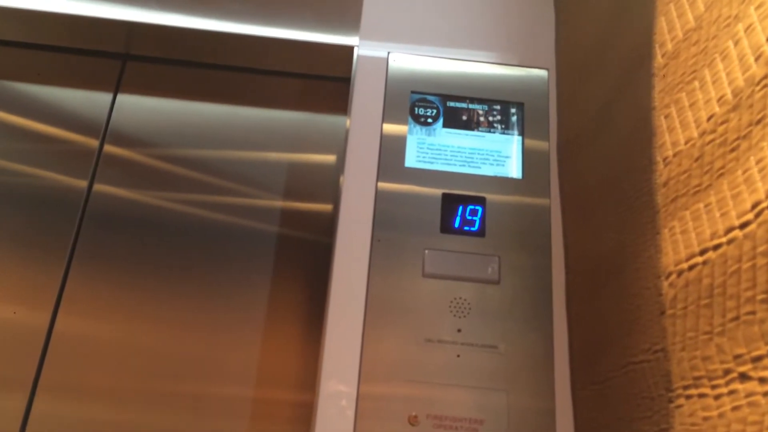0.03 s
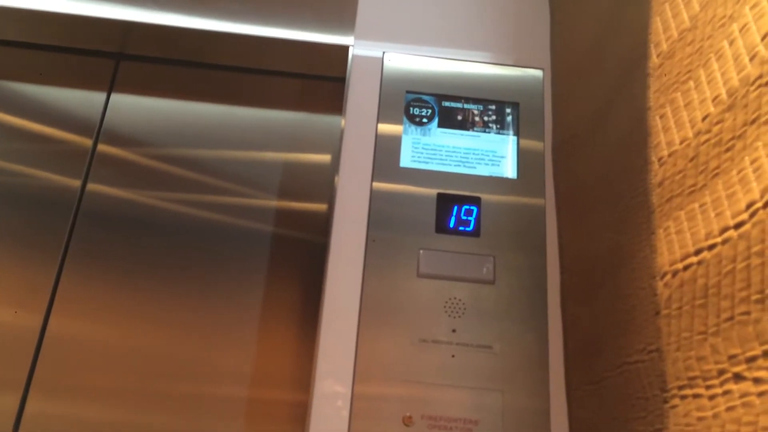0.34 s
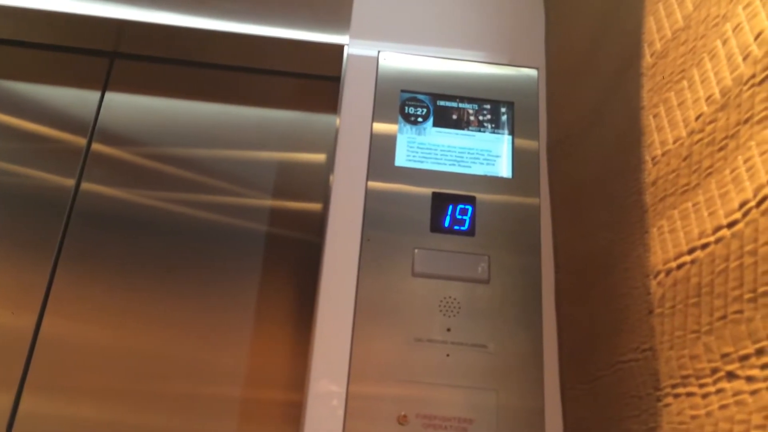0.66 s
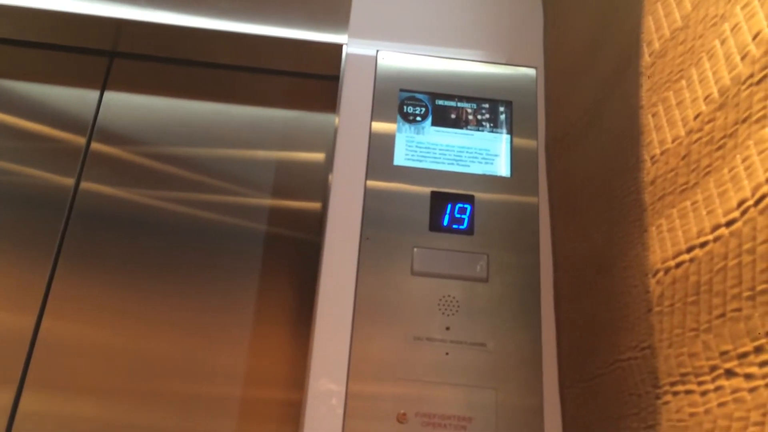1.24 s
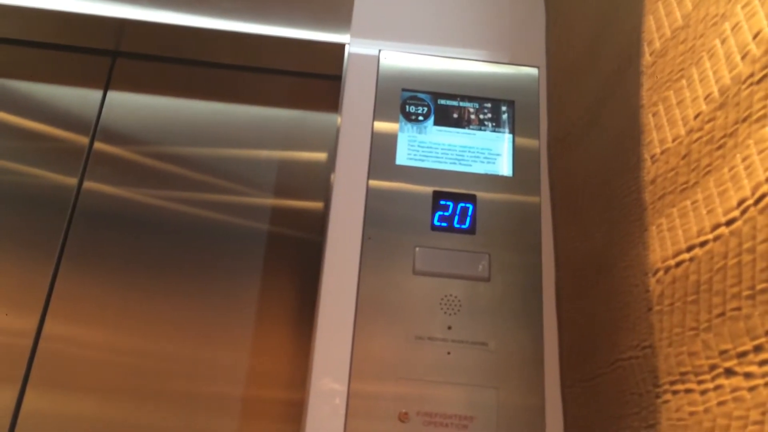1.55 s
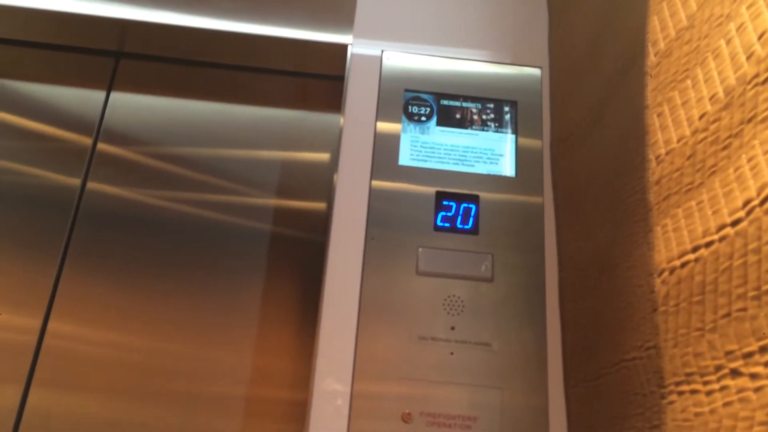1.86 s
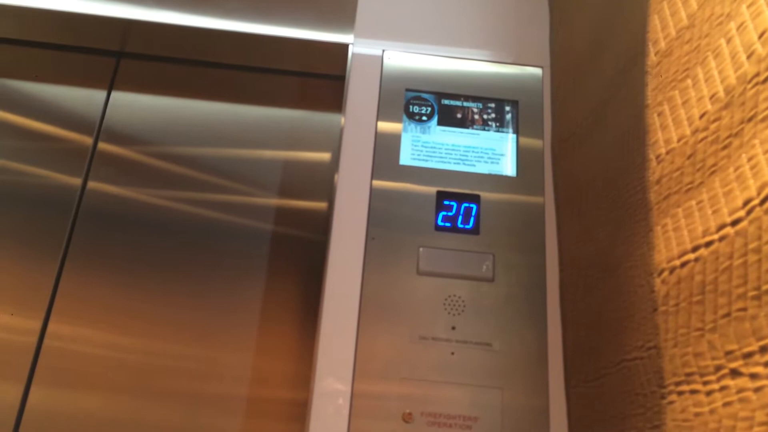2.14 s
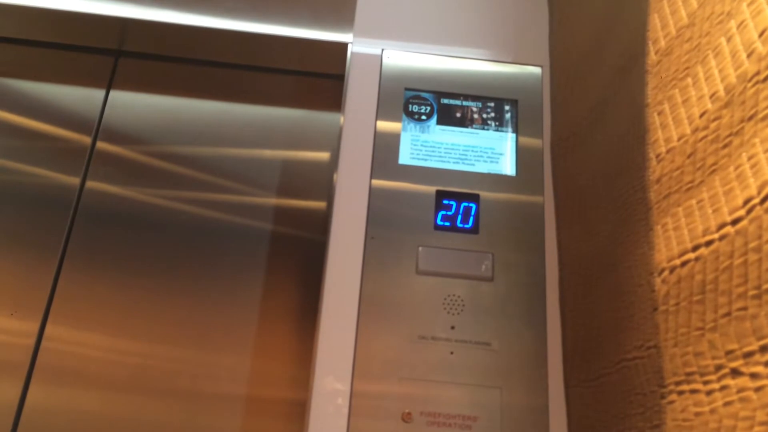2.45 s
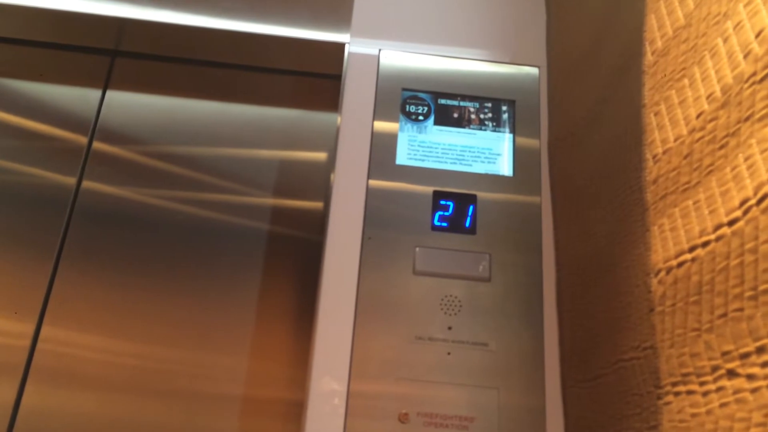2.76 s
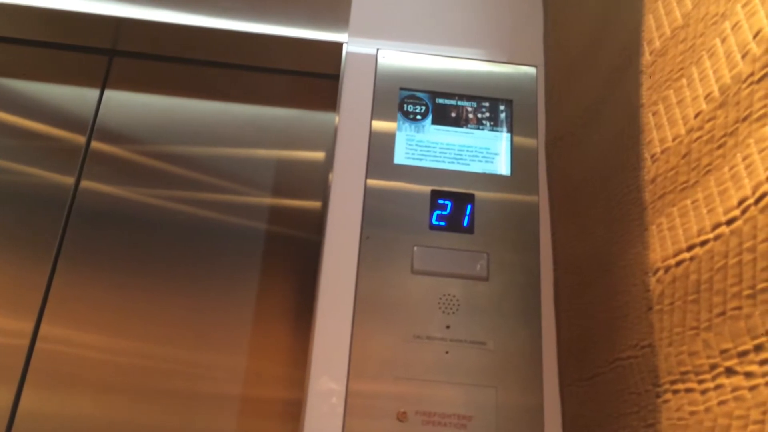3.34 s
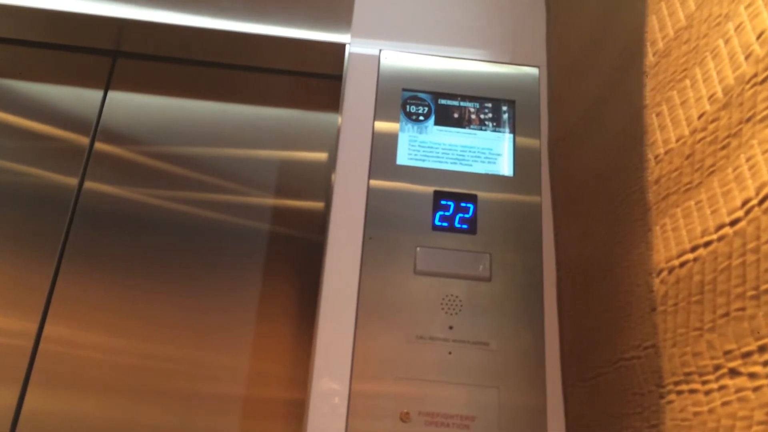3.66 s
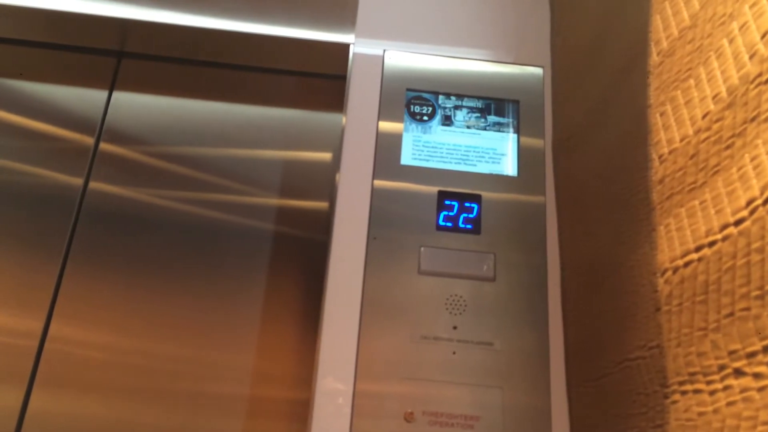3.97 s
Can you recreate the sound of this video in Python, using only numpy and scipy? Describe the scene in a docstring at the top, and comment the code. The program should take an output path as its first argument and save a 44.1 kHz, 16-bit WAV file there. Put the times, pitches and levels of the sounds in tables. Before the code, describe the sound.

An elevator car rumbles throughout with a wavering low hum and soft rushing air, booming slightly near 0.3 and 1.9 seconds. Light heel taps, scuffs, tiny ticks and faint clothing rustle are scattered until about 3.5 seconds. A hard catch snaps loudly with a brief ring at about 1.1 seconds, and a latch clicks more softly at 2.8. The clicks echo briefly off the close walls.

```python
"""A rising elevator car rumbles and booms as the rails shake the air in the cabin.
Under it the hoist gives a wavering hum, and air rushes in the shaft.
A passenger shifts about: clothes rustle, heels tap the hard floor, soles scuff and faintly squeak.
A hard catch snaps loudly with a brief ring; later a latch clicks shut more softly.
Grit or fittings tick now and then, and the clicks echo briefly off the close walls."""
import sys
import numpy as np
from scipy import signal
from scipy.fft import rfft, irfft
from scipy.io import wavfile
from scipy.ndimage import uniform_filter1d

SR = 44100
rng = np.random.default_rng(int(sys.argv[2]) if len(sys.argv) > 2 else 0)


def wrap_up_sound(samples):
    """Save the sound to the file named by the first command line argument, as 16-bit audio."""
    columns = np.atleast_2d(samples).T
    # keep every value between -1 and 1, then stretch to whole-number steps
    tamed = np.clip(columns, -1, 1)
    steps = np.round(tamed * 32767).astype(np.int16)
    wavfile.write(sys.argv[1], SR, steps)


N = 176400
T = np.arange(N) / SR


def amp(db):
    """Turns decibels into a volume multiplier."""
    return 10 ** (np.asarray(db) / 20)


def evened(x):
    """Scales a signal to an average strength (rms) of 1."""
    return x / np.sqrt(np.mean(x ** 2) + 1e-20)


def add(mix, start, sound):
    """Mixes a sound in at a start time in seconds."""
    part = mix[max(round(start * SR), 0):][:len(sound)]
    part += sound[:len(part)]


def level(points):
    """Draws a volume curve through points of seconds and dB."""
    return amp(np.interp(T, *np.transpose(points)))


def colour(x, points, size=4096):
    """Shapes the tone. The points only set the balance between low and high, not the volume."""
    hz, db = np.transpose(points)
    log_hz = np.log(abs(np.fft.fftfreq(size, 1 / SR)) + 1)
    log_gain = np.log(amp(np.interp(log_hz, np.log(hz), db)))
    response = np.exp(np.conj(signal.hilbert(log_gain)))  # nothing sounds ahead of a hit
    taps = np.fft.ifft(response).real
    return signal.fftconvolve(x, taps / np.linalg.norm(taps))[:len(x)]


def drift(rate_hz):
    """A smooth random wander; a higher rate makes it quicker."""
    smoothing = 1 + (np.fft.rfftfreq(N, 1 / SR) / rate_hz) ** 2
    return evened(irfft(rfft(rng.standard_normal(N)) / smoothing, N))


def ring(modes, rise_s):
    """A struck object rings with a few tones. Each drops 60 dB over its fade time."""
    t = T[:SR // 2]
    tones = sum(amp(db - 60 * t / fade_s) * np.sin(2 * np.pi * (hz * t + rng.random()))
                for hz, db, fade_s in modes)
    return (1 - np.exp(-t / rise_s)) * tones


def impact(direct, early, fade_s, near_walls_s=0.0027, echo_s=0.0095):
    """A click in the cabin: the direct sound, a burst off near walls, an echo and a dulling tail."""
    t = T[:SR // 3]
    noise = rng.standard_normal(len(t))
    dull = signal.sosfiltfilt(signal.butter(4, 10800, fs=SR, output="sos"), noise)
    treble = (noise - dull) * amp(-234 * t)  # loses an extra 234 dB a second
    burst = 1 + early * np.exp(-(t / near_walls_s) ** 2)
    out = (dull + treble) * amp(-60 * t / fade_s) * burst
    out /= np.linalg.norm(out)
    out[0] -= direct
    out[round(echo_s * SR)] -= direct
    return out / np.linalg.norm(out)


# The tone of the rushing air. Each row: frequency in Hz, relative level in dB.
AIR_TONE = [(100, 2), (300, 7), (450, 0.5), (650, -3), (900, -3), (1350, -6), (2000, -15), (3000, -25),
            (5000, -30), (9000, -33), (15000, -36)]
# How loud the air is. Each row: time in seconds, level in dB.
AIR_LEVEL = [(0, -51), (.25, -49), (.5, -51), (.95, -52.5), (1.2, -49.5), (1.6, -52), (2.7, -51.5),
             (2.95, -54), (3.4, -53), (4, -58.5)]

def shaft_air(flutter_db=1.42):
    """Air rushes through the shaft, a little unevenly."""
    air = rng.standard_normal(N) * amp(flutter_db * drift(rate_hz=20))
    return colour(air, AIR_TONE) * level(AIR_LEVEL)


# The tone of rubbing cloth. Each row: frequency in Hz, relative level in dB.
CLOTH_TONE = [(500, -10), (1800, 12), (3500, 2.5), (6000, 1), (9000, -4.5), (14000, -8.5), (16000, -19)]
# How loud the cloth is. Each row: time in seconds, level in dB.
CLOTH_LEVEL = [(0, -72.5), (.24, -70.5), (.45, -89), (.9, -74), (1.17, -63), (1.31, -66), (1.4, -72.5),
               (1.48, -64), (1.99, -66), (2.07, -55.5), (2.11, -59), (2.155, -59), (2.19, -63.5),
               (2.54, -66), (2.65, -60.5), (2.78, -59.5), (2.88, -70), (3.13, -62), (3.25, -66.5),
               (4, -66.5)]

def clothes(grain_db=1.5, clump_db=1):
    """Fabric rubs in fine grains that come in clumps."""
    grain = amp(grain_db * drift(rate_hz=210) + clump_db * drift(rate_hz=13))
    return colour(evened(rng.standard_normal(N) * grain), CLOTH_TONE) * level(CLOTH_LEVEL)


# The squeak's fuzzy tones. Each row: pitch in Hz, width in Hz, level in dB.
SQUEAK_TONES = [(1590, 150, -60), (4730, 420, -74)]

def sole_squeak(middle_s=0.25, half_length_s=0.075):
    """Rubber drags on the floor and squeaks faintly."""
    tones = np.zeros(N)
    for hz, width, db in SQUEAK_TONES:
        phase = 2 * np.pi * hz * T
        tones += amp(db) * evened(drift(width / 2) * np.cos(phase) + drift(width / 2) * np.sin(phase))
    return tones * np.exp(-((T - middle_s) / half_length_s) ** 4)


# Small bright ticks. Each row: start in seconds, pitch in Hz, level in dB.
GRIT_TICKS = [(.205, 9400, -42.5), (0.542, 5860, -33.5), (1.564, 2900, -31.5), (1.605, 2830, -27.5),
              (2.431, 5800, -36), (2.584, 2680, -31), (2.584, 6040, -34), (3.368, 3000, -30.5),
              (3.372, 6900, -41)]

def ticks(width_hz=520):
    """Grit or fittings give tiny pings that echo in the cabin."""
    out, t = np.zeros(N), T[:SR // 100]
    for start, hz, db in GRIT_TICKS:
        ping = np.exp(-np.pi * width_hz * t) * np.sin(2 * np.pi * hz * t)
        cabin = impact(direct=0.32, early=0.19, fade_s=0.12)
        add(out, start, amp(db) * signal.fftconvolve(cabin, ping / np.linalg.norm(ping)))
    return out


# The tones of a dull bump. Each row: pitch in Hz, relative level in dB, fade time in seconds.
BUMP_TONES = [(463, 0, 0.15), (410, 0.5, 0.043), (635, 3, 0.026)]
# Soft scuffs. Each row: middle in seconds, about half the length in seconds, level in dB.
SOLE_SCUFFS = [(0.188, 0.023, -44), (0.325, 0.027, -44), (1.195, 0.01, -40.5), (1.216, 0.022, -49),
               (1.313, 0.012, -45), (2.117, 0.0093, -49), (2.214, 0.032, -42)]
# The tone of a scuff. Each row: frequency in Hz, relative level in dB.
SCUFF_TONE = [(120, -14.5), (300, 1), (460, 1), (650, -8), (950, -11.5), (1400, -19.5), (3000, -55),
              (10000, -103)]

def soles(bump_s=1.1995):
    """Soles bump the floor once and scuff softly across it."""
    out = np.zeros(N)
    add(out, bump_s, amp(-34.5) * ring(BUMP_TONES, rise_s=0.00081))
    pressure = sum(amp(db) * np.exp(-((T - middle) / half) ** 2 / 2) for middle, half, db in SOLE_SCUFFS)
    return out + pressure * colour(rng.standard_normal(N), SCUFF_TONE)


# Heel taps. Each row: start in seconds, ring level in dB, favoured ring pitch in Hz,
# click level in dB, thump level in dB. The levels are relative.
HEEL_TAPS = [(.378, -5, 1320, -7.5, -5.5), (0.5405, 0.5, 1140, -7, -10.5), (.576, -1, 1230, -8, -2),
             (0.758, -12, 1300, -22, -5), (1.309, -7.5, 1350, -10, -18), (1.452, -5, 1110, -11.5, -7),
             (1.562, 0.5, 1300, -4.5, 0), (2.268, -5.5, 1330, -5.5, -3), (2.424, -4, 1190, -24, -9),
             (2.4304, -0.5, 1330, -0.5, 1.5), (3.282, -18, 1260, -16, -23), (3.366, -14, 1320, -10.5, -20),
             (3.428, -13, 1310, -16, -3.5)]
# The tones of heel and floor. Each row: pitch in Hz, relative level in dB, fade time in seconds.
HEEL_TONES = [(942, 0, 0.077), (1070, 0.5, 0.052), (1165, -2.5, 0.1), (1294, -3.5, 0.16), (1867, -9, 0.057),
              (2116, -3, 0.091), (2310, -5.5, 0.065)]
FLOOR_TONES = [(91, -24, 0.17), (143, -1, 0.27), (172.8, -7.5, 0.35), (240.3, -11.5, 0.22),
               (281.8, -11.5, 0.33)]
# The tone of a heel's click. Each row: frequency in Hz, relative level in dB.
HEEL_CLICK_TONE = [(150, 14), (450, 9), (800, 4), (1200, 6), (2200, 1.5), (2700, -11), (3400, -12),
                   (4300, -22.5), (6000, -24), (8000, -32), (15000, -35)]

def heels(drop_db_per_octave=22):
    """Each heel rings, clicks and thumps the floor. Tones far from its favoured pitch ring less."""
    out = np.zeros(N)
    for start, ring_db, ring_hz, click_db, thump_db in HEEL_TAPS:
        tones = [(hz, db - drop_db_per_octave * abs(np.log2(hz / ring_hz)), fade_s)
                 for hz, db, fade_s in HEEL_TONES]
        add(out, start, amp(ring_db - 35.5) * ring(tones, rise_s=0.00087))
        click = colour(impact(direct=0.44, early=0.16, fade_s=0.16), HEEL_CLICK_TONE)
        add(out, start, amp(click_db - 9) * click)
        add(out, start, amp(thump_db - 25.5) * ring(FLOOR_TONES, rise_s=0.012))
    return out


# The latch's hits. Each row: start in seconds, knock level in dB, click level in dB.
LATCH_HITS = [(2.8099, -14.5, -42), (2.8127, -12.5, -22.5), (2.8204, -16.5, -27)]
# The tone of its dull knock and bright click. Each row: frequency in Hz, relative level in dB.
KNOCK_TONE = [(100, -10), (280, -6.5), (580, 2.5), (850, -4.5), (1300, -1.5), (1700, -1.5), (2400, -11),
              (3000, -8), (3500, -17.5), (4200, -13), (5500, -25), (15000, -45)]
CLICK_TONE = [(500, -7), (2500, 3), (7000, 0), (10500, -6), (13500, -6), (16000, -14)]

def latch():
    """A latch rattles softly shut: three quick hits heard as one."""
    out = np.zeros(N)
    for start, knock_db, click_db in LATCH_HITS:
        knock = colour(impact(direct=0.37, early=0.92, fade_s=0.13), KNOCK_TONE)
        click = colour(impact(direct=0.4, early=0.8, fade_s=0.12), CLICK_TONE)
        add(out, start, amp(knock_db) * knock + amp(click_db) * click)
    return out


# The cracks in the snap. Each row: seconds after the blow (minus is before), relative level in dB.
CATCH_CRACKS = [(-.003, -13), (.0008, -0.5), (.0054, 0)]
# The tone of its hollow body and bright cracks. Each row: frequency in Hz, relative level in dB.
BODY_TONE = [(60, -32), (150, -14), (400, -2), (880, 6.5), (1150, 2), (1560, 0.5), (2100, -15), (2850, -9),
             (3300, -36), (6000, -38), (15000, -45)]
CRACK_TONE = [(60, -48), (400, -12), (1500, -2.5), (2900, 12.5), (3300, 4), (4500, 0), (5600, 4.5),
              (6700, 3.5), (7800, 4.5), (8800, -2.5), (9700, 5.5), (10500, -8), (11900, 3), (13500, 6.5),
              (15500, -4)]
# The tones of catch and panel. Each row: pitch in Hz, relative level in dB, fade time in seconds.
CATCH_TONES = [(510, -5.5, 0.11), (634, -3, 0.14), (744, -4.5, 0.14), (1013, 0, 0.087), (1240, 4, 0.086),
               (1345, -6.5, 0.14), (1415, -4, 0.074), (1654, -7, 0.14), (2880, -10.5, 0.16),
               (2935, -7.5, 0.14), (7812, -9, 0.095), (9680, -10, 0.083)]
PANEL_TONES = [(157, -1, 0.13), (293, -3.5, 0.2), (373, 4, 0.1)]

def catch_snap(start=1.0566, blow_hz=1090, blow_fade_s=0.019):
    """A hard catch snaps home with a blunt blow, cracks and rings, and knocks the panel behind it."""
    out = np.zeros(N)
    add(out, start, amp(-17) * ring([(blow_hz, 0, blow_fade_s)], rise_s=0.0003))
    add(out, start, amp(1.5) * colour(impact(direct=0.21, early=0.24, fade_s=0.14), BODY_TONE))
    add(out, start, amp(-25) * ring(CATCH_TONES, rise_s=0.0031))
    add(out, start, amp(-37) * ring(PANEL_TONES, rise_s=0.0015))
    for delay, db in CATCH_CRACKS:
        crack = colour(impact(direct=0.16, early=0.7, fade_s=0.13), CRACK_TONE)
        add(out, start + delay, amp(db - 3) * crack)
    return out


def hoist_hum(pitch_hz=94, waver_hz=6.02, waver_db=3.5):
    """The hoist's low hum wavers in pitch and strength."""
    cycles = np.cumsum(pitch_hz + waver_hz * drift(rate_hz=9.7)) / SR
    strength = amp(waver_db * drift(rate_hz=11))
    return evened(strength * np.sin(2 * np.pi * cycles))


# The tone of the rumble. Each row: frequency in Hz, relative level in dB.
RUMBLE_TONE = [(10, -27.5), (24, -30), (33, -13), (46, -18), (65, -4.5), (88, -1.5), (115, -8), (185, -10),
               (215, -16), (290, -27.5), (380, -40), (700, -63.5)]
# How loud the rumble is. Each row: time in seconds, level in dB.
CABIN_LEVEL = [(0, -44), (.6, -42.5), (1.0, -43), (1.4, -44.5), (1.65, -38), (1.85, -42.5), (2.05, -36.5),
               (2.35, -40), (2.55, -35), (2.9, -41.5), (3.15, -38), (3.35, -40.5), (3.55, -38.5),
               (3.72, -43), (4, -40.5)]
# Notes the cabin's air boosts. Each row: pitch in Hz, width in Hz, strength of the added part in dB.
CABIN_NOTES = [(102.8, 5.2, 0.19), (139.1, 10, 0.54), (170, 11, 2.8), (284.2, 6.8, 3.1)]
# Low booms. Each row: middle in seconds, half the length in seconds, pitch in Hz, level in dB.
CABIN_BOOMS = [(.254, 0.048, 94.4, -25.5), (1.929, 0.019, 95, -25.5), (3.127, 0.015, 92.4, -29.5),
               (3.51, 0.024, 88, -31)]

def cabin_rumble(hum_db=-8.5):
    """The rails shake the cabin's air, whose lowest note swells into booms. The hum follows the rumble."""
    hz = np.fft.rfftfreq(N, 1 / SR)
    boost = 1 + sum(amp(db) / (1 + (2 * (hz - pitch) / width) ** 2) for pitch, width, db in CABIN_NOTES)
    shaking = colour(rng.standard_normal(N), RUMBLE_TONE)
    out = evened(irfft(rfft(shaking) * boost, N))
    loudness = level(CABIN_LEVEL)
    out *= loudness / np.sqrt(uniform_filter1d(out ** 2, size=9000))  # smooths out chance swells
    for middle, half, pitch, db in CABIN_BOOMS:
        swell = amp(db) * np.exp(-abs((T - middle) / half) ** 3)
        out += swell * np.sin(2 * np.pi * (pitch * T + rng.random()))
    return out + amp(hum_db) * loudness * hoist_hum()


def scene():
    """Adds up everything heard in the car, in one channel."""
    ride = cabin_rumble() + shaft_air()
    passenger = clothes() + heels() + soles() + sole_squeak()
    return (ride + passenger + catch_snap() + latch() + ticks())[None]


def record(dry):
    """Cuts the highest treble, above 15400 Hz."""
    treble_cut = signal.firwin(401, 15400, window=("kaiser", 8), fs=SR)
    return signal.oaconvolve(dry, treble_cut[None], "same")


dry = scene()
out = record(dry)
wrap_up_sound(out)
```